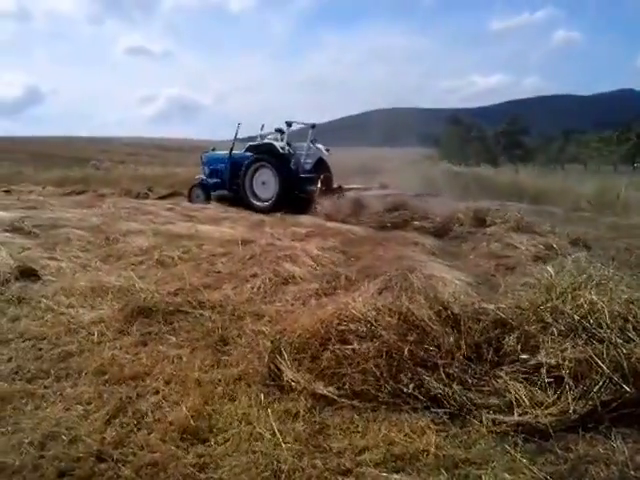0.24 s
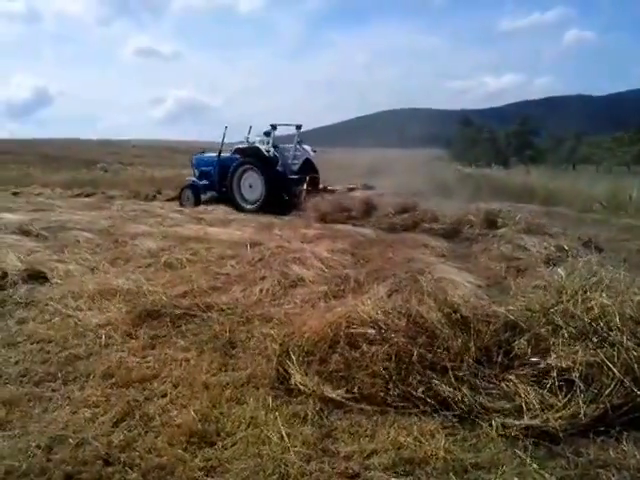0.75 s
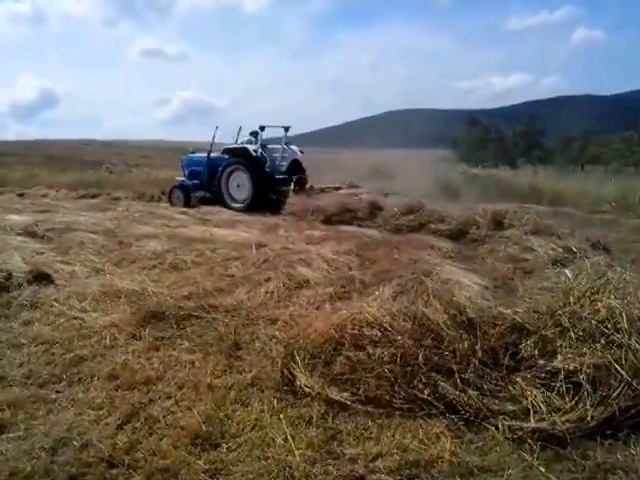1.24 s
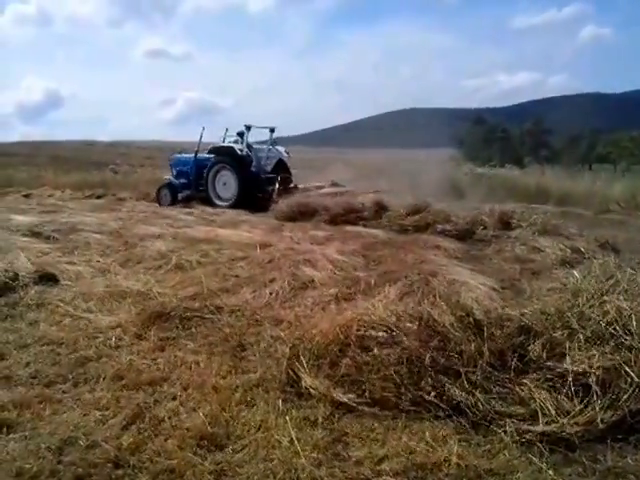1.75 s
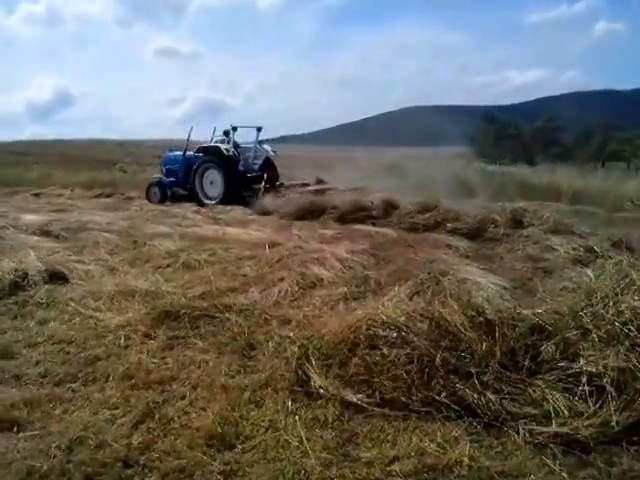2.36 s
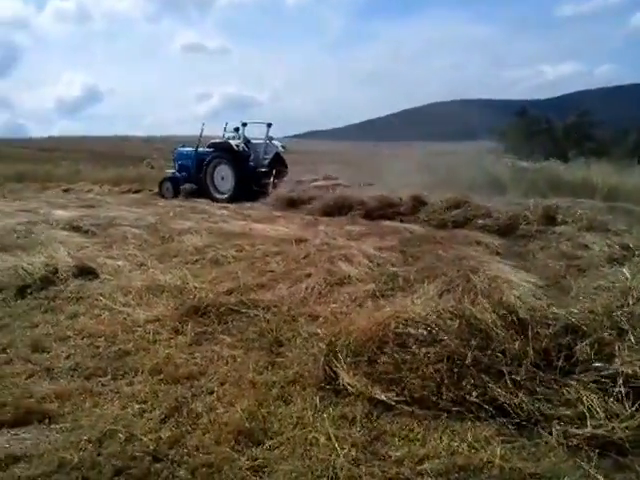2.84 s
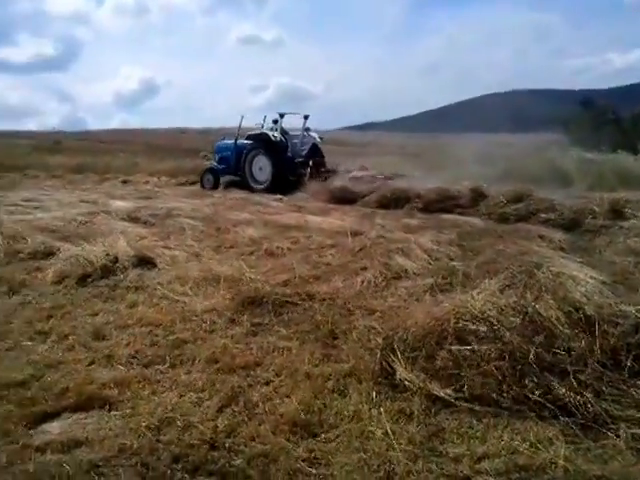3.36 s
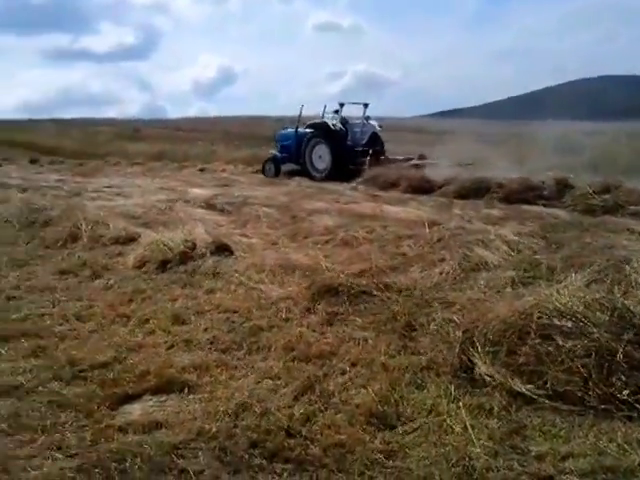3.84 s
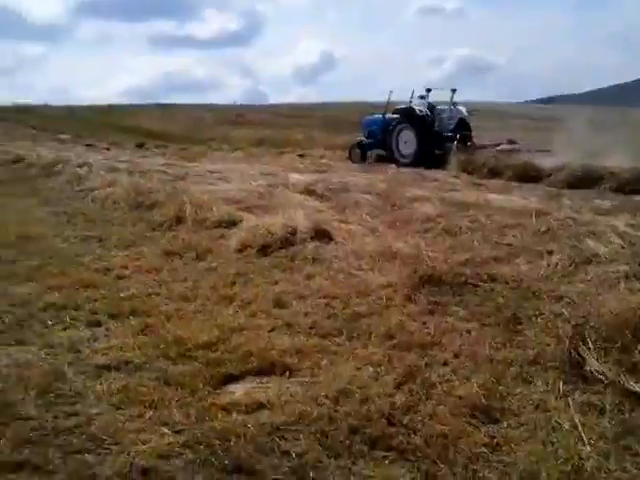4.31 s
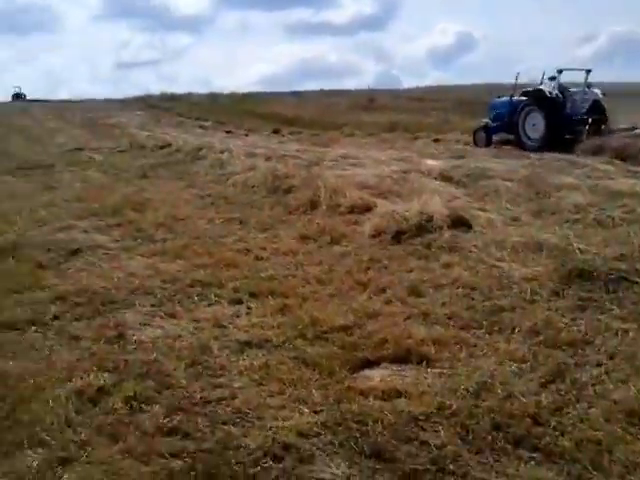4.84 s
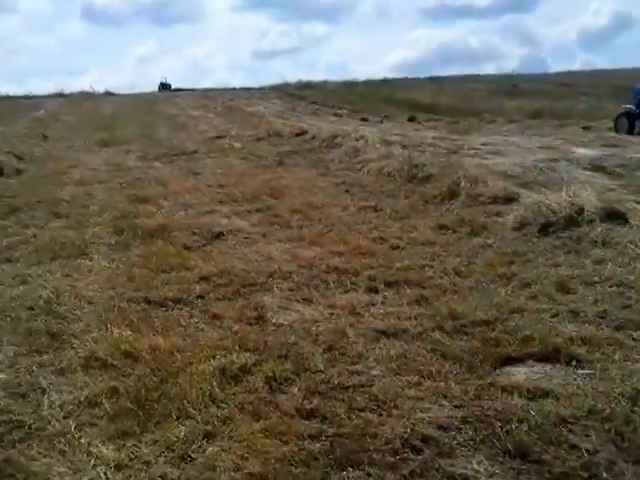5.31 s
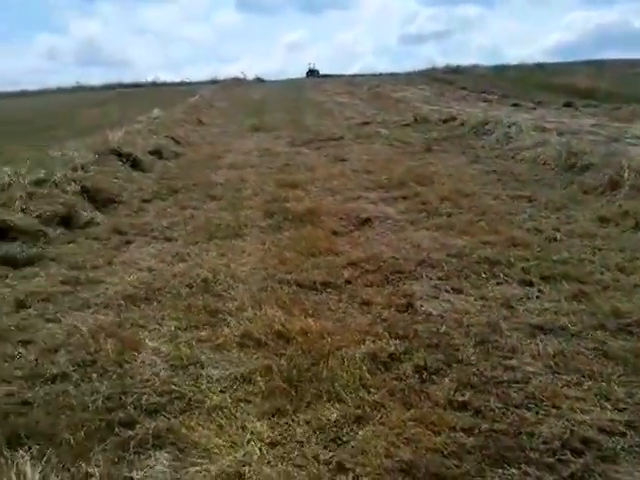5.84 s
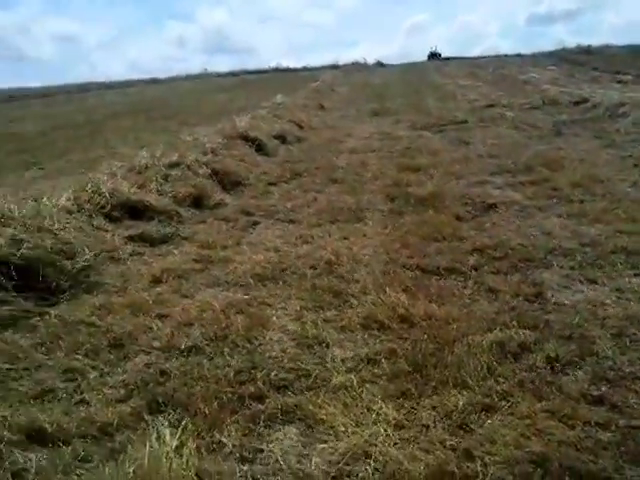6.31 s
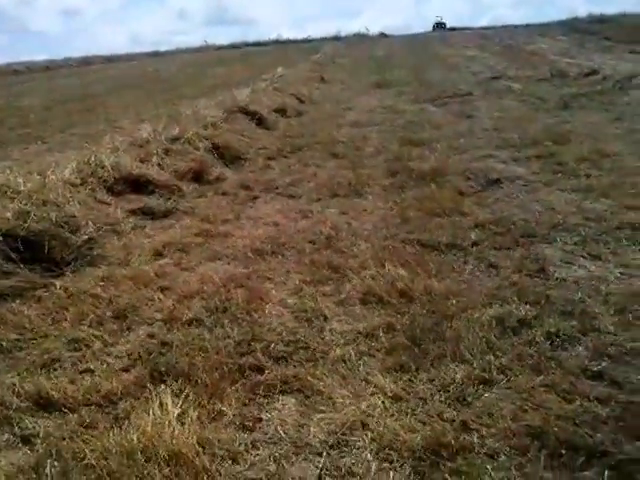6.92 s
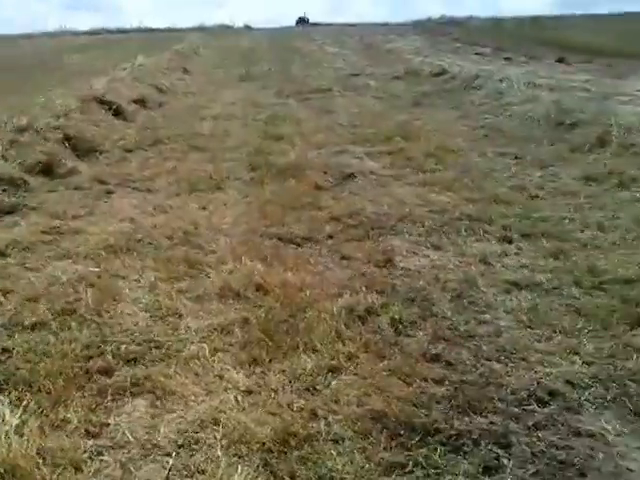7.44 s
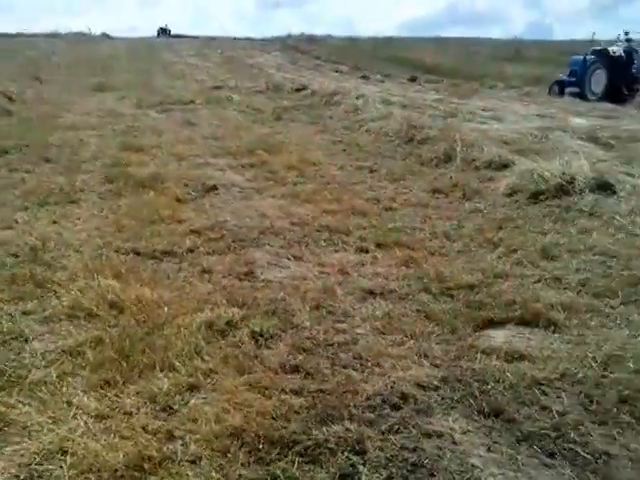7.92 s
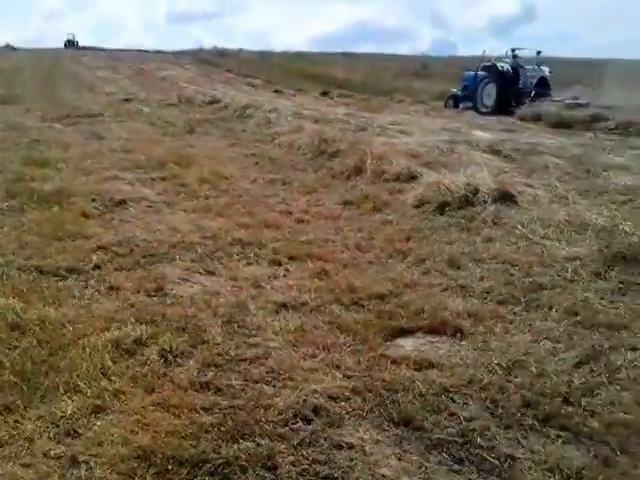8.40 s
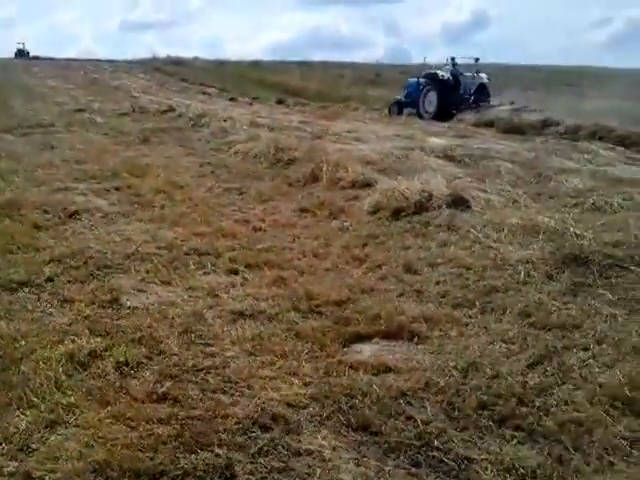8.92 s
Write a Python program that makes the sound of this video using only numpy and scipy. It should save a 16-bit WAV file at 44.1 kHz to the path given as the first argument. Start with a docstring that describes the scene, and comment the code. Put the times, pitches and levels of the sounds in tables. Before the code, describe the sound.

Dry hay crackles and crunches under feet close to a hand-held microphone, over the even putter, drone and clatter of a diesel tractor farther out in the field. The engine fades only slightly as it moves off, and its rake adds a faint ringing hiss, small clanks and an occasional thin squeak. Wind buffets the microphone in short low bursts, early on, most strongly midway, and again a little later.

```python
"""Tractor raking hay

A diesel tractor pulls a hay rake across a field, some way off, slowly drawing away: the exhaust
putters, the engine clatters and whines, the rake hisses, squeaks and clanks. Dry hay rustles and
crunches underfoot close to a hand-held camera, and gusts thump on its single microphone."""
import sys
import numpy as np
from scipy import signal
from scipy.fft import rfft, irfft, next_fast_len
from scipy.io import wavfile
from scipy.ndimage import uniform_filter1d, map_coordinates

SR = 44100
rng = np.random.default_rng(int(sys.argv[2]) if len(sys.argv) > 2 else 0)


def to_wav(sig):
    """Store sig (one row per channel, or 1-D mono) as 16-bit WAV at the path in sys.argv[1].

    Samples outside -1..1 are clipped; the rate is SR.
    """
    pcm = np.clip(np.atleast_2d(sig), -1, 1) * 32767
    pcm = np.round(pcm).astype(np.int16)
    wavfile.write(sys.argv[1], SR, pcm.T)  # frames by channels


N = 403956

# how hard the hay is stirred underfoot (time [s], level [dB])
HAY_STIR = [(0, -34.5), (0.66, -33.5), (0.82, -30.5), (1.7, -32.5), (2.55, -34.5), (3.7, -34.5), (4.2, -30),
            (4.5, -25.5), (4.95, -33), (5.8, -31.5), (6.15, -38.5), (6.45, -30), (7.0, -31), (7.65, -34.5),
            (8.25, -35.5), (8.9, -39), (9.16, -34)]


def tractor():
    """Exhaust, drone, clatter and whine follow the engine's speed and fade as the tractor draws away."""
    # engine speed (time [s], exhaust beats [1/s])
    speed = [(0, 35.71), (0.5, 35.98), (1.55, 35.52), (3, 35.43), (3.5, 36.13), (4.6, 35.89), (6.7, 35.98),
             (7, 36.28), (7.8, 36.26), (8.1, 35.85), (8.45, 36.2), (8.8, 35.88)]
    # tones of gears and fan (pitch [multiple of the beat rate], level [dB], waver [dB])
    gear_tones = [(18, -47, .8), (21, -53, 2.5), (21.66, -49.5, 2.5), (32.45, -52, 2.5)]
    start_m, away_m_per_s = 18, 1
    putter_db, drone_db, clatter_db = -37.5, -41, -32.5  # at the starting distance
    nearness = start_m / (start_m + away_m_per_s * np.arange(N) / SR)
    beats = np.cumsum(curves(speed)[0] * (1 + 0.0006 * wobble(11))) / SR
    putter = amp(putter_db + 1.4 * wobble(2.995)) * exhaust(beats, scatter_db=0.7)
    body = amp(drone_db) * drone(beats)
    # an unsteady shaft and moving air blur the tones, the higher ones most
    shaft = beats + .0015 * wobble(30)
    whine = sum(amp(db + waver * wobble(7)) * np.sqrt(2) * np.sin(2 * np.pi * multiple * shaft)
                for multiple, db, waver in gear_tones)
    metal = amp(clatter_db) * clatter(beats, depth_db=1.2, waver_db=1.5)
    return nearness * (putter + body + whine + metal)


def exhaust(beats, scatter_db):
    """Three unequal cylinders blow through the pipe in turn: a strong puff each beat, then a weak one."""
    # strength of each cylinder, in firing order (level [dB])
    cylinder_db = [-2, 0, 0.2]
    # puffs within one beat (place in the beat [0-1], level [dB])
    puffs = [(.38, 7), (0.812, -2.5)]
    # tone of the exhaust pipe (frequency [Hz], gain [dB])
    pipe_eq = [(25, -45), (40, -46), (70, -4.5), (110, -1), (145, 1), (180, 3), (215, 1.5), (250, 0.5),
               (330, -8), (450, -19), (900, -28.5)]
    beat_starts, pulses = np.arange(int(beats[-1]) + 1), np.zeros(N)
    for place, db in puffs:
        at = np.searchsorted(beats, beat_starts + place)
        size = amp(db + np.resize(cylinder_db, len(at)) + scatter_db * rng.standard_normal(len(at)))
        pulses += np.bincount(at, size, N + 1)[:N]
    # the silencer holds each puff back near its 190 Hz resonance, which rounds it off
    ring = lambda hz: 190 ** 2 - hz ** 2 + 1j * hz * 170
    return coloured(filtered(pulses, lambda hz: np.conj(ring(hz)) / ring(hz)), pipe_eq)


def clatter(beats, depth_db, waver_db):
    """Combustion knock and valve gear shake the metal twice a beat, heard side-on, then tail-on."""
    # the turn from side-on to tail-on (time [s], tail share [0-1], level [dB])
    turn = [(0, 0.15, -1), (3.0, 0.13, 0), (4.0, 0.44, -0.5), (5.5, 1, 1.5), (7.0, 1, 3), (7.8, 0.98, -0.1),
            (9.16, 0.96, 0)]
    # peaks of the clatter heard from the side, coloured by ground and nearby reflections
    # (frequency [Hz], width [Hz], level [dB])
    side_peaks = [(762, 134, 4.5), (932, 120, 6), (1230, 170, 6), (1267, 217, 6.5), (2030, 266, 4.5),
                  (2766, 320, 3), (3480, 300, 5), (4160, 420, 1), (4760, 510, -0.5), (5320, 170, 4.5),
                  (6310, 140, -1), (6980, 76, 4), (10650, 1200, -8)]
    # peaks of the clatter heard from the tail (frequency [Hz], width [Hz], level [dB])
    tail_peaks = [(850, 380, 1), (960, 400, 1.5), (1190, 144, 6.5), (1805, 217, 6.5), (2214, 340, 2.5),
                  (2760, 300, 3.5), (3470, 240, 2), (5160, 1850, -1), (7400, 4100, -10.5)]
    # the side-on clatter's tone slides slightly as the hand-held camera moves (time [s], pitch [ratio])
    camera_drift = [(0, .994), (2.2, 1.012), (3.8, .982)]
    tail_share, facing_db = curves(turn)
    knocks = amp(depth_db * np.cos(4 * np.pi * beats) + np.cos(2 * np.pi * beats))
    side = resonant(knocks * rng.standard_normal(N), side_peaks) * amp(4.5)
    side = map_coordinates(side, [np.cumsum(curves(camera_drift)[0])], mode="mirror")
    tail = resonant(knocks * rng.standard_normal(N), tail_peaks) * amp(1.0)
    crossfade = np.sqrt(1 - tail_share) * side + np.sqrt(tail_share) * tail
    return crossfade * amp(facing_db + waver_db * wobble(14))


def drone(beats):
    """A low bed of engine noise swells slightly once a beat."""
    # spectrum of the drone (frequency [Hz], density [dB])
    drone_eq = [(20, -33), (45, -29), (90, -20), (160, -9.5), (260, 4), (380, -5.5), (520, -7.5), (700, -7),
                (1100, -18), (2000, -40)]
    return amp(-0.5 * np.sin(2 * np.pi * beats)) * coloured(rng.standard_normal(N), drone_eq)


def underfoot():
    """The hay reaches the microphone directly and once more off a surface close by."""
    echo_s, echo_gain = .0016, .22
    hay = rustle() + crunches() + small_crunches()
    return filtered(hay, lambda hz: 1 + echo_gain * np.exp(-2j * np.pi * hz * echo_s))


def rustle():
    """Dry stalks rub and crack in small clumps; a finer, brittle hiss lies on top."""
    # spectrum of rubbing straw (frequency [Hz], density [dB])
    straw_eq = [(200, -24), (600, -13.5), (1500, -1), (2500, -3), (4200, 4.5), (6000, 2.5), (8200, -0.5),
                (9200, -16), (12000, -30), (16000, -26)]
    # spectrum of the brittle hiss (frequency [Hz], density [dB])
    brittle_eq = [(3000, -36), (6500, 4.5), (8300, 2), (9300, -1.5), (11300, 1), (13000, -2.5),
                  (15500, -6.5)]
    # fader ride of that hiss (time [s], level [dB])
    brittle_ride = [(0, -35.5), (0.65, -41.5), (0.8, -34.5), (1.3, -38.5), (1.7, -35.5), (2.5, -42.5),
                    (3.1, -38), (3.5, -42), (4.0, -36.5), (4.6, -30), (5.1, -34), (5.7, -34.5), (6.0, -37),
                    (6.45, -34), (7.1, -36.5), (8.3, -37.5), (8.78, -38), (8.88, -48), (9.16, -38)]
    rustle_db, = curves(HAY_STIR)
    brittle_db = curves(brittle_ride)[0] + 0.5
    surges = clumps(per_s=45, t60=.1, depth=2.8)
    straw = coloured(patchy(crackle(N, spread_db=4), depth_db=2.6), straw_eq)
    brittle = coloured(patchy(crackle(N, spread_db=0), depth_db=1.8), brittle_eq) * amp(.8 * wobble(25))
    cracks = amp(rustle_db - 12.5) * ticks(per_s=28, hz=6500, t60=.008)
    return surges * (amp(rustle_db) * straw + amp(brittle_db) * brittle) + cracks


def ticks(per_s, hz, t60):
    """Single thin stalks crack at random moments, at rms 1."""
    kicks = (rng.random(N) < per_s / SR) * rng.random(N) ** 2
    force = signal.lfilter([1], [1, -amp(-60 / (t60 * SR))], kicks)
    return hump(force * rng.standard_normal(N), hz, octaves=1)


def crunches():
    """Feet crush tufts, large and small; a thick stalk breaks with one snap."""
    # crushed tufts (time [s], level [dB], centre [Hz], t60 [s])
    tufts = [(0.677, -15.5, 4400, 0.056), (0.69, -22.5, 2600, 0.9), (0.99, -23, 1600, 0.086),
             (1.067, -27, 5000, .1), (1.412, -26.5, 9000, 0.17), (1.455, -21, 4670, 0.049),
             (1.537, -24, 3000, 0.97), (1.612, -24, 5300, 0.76), (1.859, -22, 3000, 0.4),
             (1.915, -25, 5500, 0.32), (2.208, -26.5, 1400, 0.22), (2.243, -23, 3500, 0.64),
             (2.381, -21.5, 4570, 0.13), (2.489, -31.5, 10000, 0.092), (2.621, -29, 7800, 0.23),
             (2.735, -29, 8300, 0.34), (3.059, -21.5, 3700, 0.094), (3.712, -27, 4500, .08),
             (3.735, -21.5, 1900, 0.1), (3.805, -27, 7000, .06), (4.133, -31, 11000, 0.09),
             (4.178, -22.5, 7300, 0.072), (4.349, -12, 6600, 0.11), (4.416, -14, 2300, 0.087),
             (4.425, -20, 5000, 0.35), (4.545, -23, 6000, 0.31), (4.724, -26, 10000, .15),
             (4.965, -25.5, 8000, .15), (5.011, -23, 7950, .1), (5.048, -21.5, 3200, 0.12),
             (5.329, -24, 6500, .08), (5.479, -21, 4800, 0.33), (5.646, -22, 3900, 0.2),
             (5.805, -23, 5500, 0.33), (5.859, -22, 5500, 0.33), (6.031, -25.5, 7450, 0.66),
             (6.23, -19.5, 3860, 0.074), (6.316, -26, 8600, 0.2), (6.36, -24, 6300, 0.32),
             (6.492, -30, 12500, .18), (6.519, -17, 4340, 0.06), (6.789, -25.5, 7500, 0.19),
             (6.939, -24, 3400, 0.14), (7.022, -16, 6800, 0.046), (7.072, -21.5, 2100, 0.12),
             (7.346, -22, 6400, 0.22), (7.474, -27.5, 2000, 0.23), (7.776, -26.5, 7460, 0.14),
             (7.916, -27.5, 7300, 0.1), (8.003, -22.5, 2690, 0.15), (8.246, -28, 9800, 0.33),
             (8.56, -29, 3200, 0.21), (8.71, -31.5, 8950, 0.76)]
    # thick stalks breaking (time [s], peak [dB], centre [Hz])
    stalks = [(0.68, -21, 4800), (4.352, -7, 5650), (6.232, -17.5, 4200), (6.317, -9, 9500),
              (6.320, -6, 8100), (6.519, -11, 4200), (6.805, -2.5, 6900), (7.024, -14, 7000),
              (7.348, -10, 9600), (8.003, -15, 4500)]
    out, t = np.zeros(N), np.arange(SR // 4) / SR
    for s, db, hz, t60 in tufts:
        add(out, s, amp(db - 2.5) * crunch(hz, t60, attack_s=0.00072))
    for s, db, hz in stalks:
        snap = hump(rng.standard_normal(len(t)) * amp(-60 * t / .005), hz, octaves=.45)
        add(out, s, amp(db) * snap / np.abs(snap).max())
    return out


def small_crunches(per_s=3, over_rustle_db=3.5, centre_hz=5200):
    """Lesser tufts give way at random moments, as strongly as the hay is stirred."""
    out, count = np.zeros(N), round(per_s * N / SR)
    for k in range(count):
        s = (k + rng.random()) * N / SR / count
        size, pitch = rng.standard_normal(2)
        db = np.interp(s, *np.transpose(HAY_STIR)) + over_rustle_db + 2.0 * size
        add(out, s, amp(db) * crunch(centre_hz * np.exp(0.22 * pitch), t60=0.096, attack_s=0.0029))
    return out


def crunch(hz, t60, attack_s):
    """A crushed tuft gives way at once, then dies in a shower of fractures."""
    t = np.arange(SR // 4) / SR
    octaves = 0.79 * (t60 / 0.12) ** 0.68 * (4800 / hz) ** 1.6  # longer, deeper crunches are broader
    force = (amp(-60 * t / t60) + .5 * np.exp(-t / 0.017)) * (1 - np.exp(-t / attack_s))
    return force * hump(crackle(len(t), spread_db=0.5), hz, octaves)


def wind():
    """A breeze stirs at the microphone port; gusts flutter in trains of eddies, big eddies thump singly."""
    # light air between the gusts (time [s], level [dB])
    breeze = [(0, -51), (1.1, -48), (1.4, -45), (2.3, -43), (2.8, -50), (3.6, -48), (4.6, -36),
              (5.2, -48.5), (6.7, -38), (7.5, -44), (8.3, -41), (9.16, -45)]
    # spectrum of its rumble (frequency [Hz], density [dB])
    rumble_eq = [(25, -15), (60, 0), (110, 0), (240, 2), (400, -10.5), (800, -28), (3000, -70)]
    # fluttering gusts (time [s], level [dB], half-length [s], eddy pitch [Hz])
    gusts = [(1.562, -28, 0.037, 250), (1.828, -24.5, 0.021, 237), (1.875, -20, 0.022, 270),
             (1.984, -26, 0.046, 273), (3.927, -25.5, 0.024, 214), (4.35, -22, 0.033, 295),
             (4.45, -18, 0.056, 277), (4.515, -17.5, 0.028, 300), (4.79, -23.5, 0.006, 237),
             (5.532, -22, 0.0064, 258), (5.815, -21.5, 0.032, 240), (5.917, -25.5, 0.026, 268),
             (5.964, -20.5, 0.011, 493), (6.466, -31, 0.05, 247), (6.585, -24.5, 0.039, 233),
             (6.671, -22, 0.053, 242), (6.891, -24, 0.049, 256), (6.985, -23, 0.058, 250),
             (7.119, -27.5, 0.023, 226)]
    # single big eddies (time [s], level [dB], pitch [Hz])
    thumps = [(1.541, -9, 287), (1.862, -9.5, 374), (1.886, -9, 229), (1.925, -9.5, 227),
              (3.089, -16.5, 264), (4.336, -9, 310), (4.349, -9, 302), (4.396, -6.5, 210), (4.417, -6, 230),
              (4.431, -7.5, 388), (4.458, -2, 282), (4.470, -9, 350), (4.501, -9.5, 402),
              (4.545, -0.5, 330), (5.729, -17, 220), (5.807, -6.5, 317), (5.821, -10, 310),
              (5.830, -6.5, 288), (6.646, -11, 323), (6.665, -10, 290), (6.739, -11, 283),
              (6.909, -16, 276), (6.945, -10, 289), (6.965, -6.5, 278), (6.981, -15, 404),
              (8.199, -17.5, 320)]
    # how the port colours the wind (frequency [Hz], gain [dB])
    port_eq = [(20, -36), (100, -2.5), (330, -2), (510, 4), (700, -1.5), (950, 3.5), (1200, 5), (1600, -10)]
    eddy_gap_s, wake_s, wake_db = 0.0052, 0.12, -12.5
    out = amp(curves(breeze)[0] + 4.8 * wobble(16)) * coloured(rng.standard_normal(N), rumble_eq)
    t = np.arange(-SR // 4, SR // 4) / SR
    slots = np.arange(-12, 13)
    for s, db, half_s, hz in gusts:
        at = (slots + 0.262 * rng.standard_normal(len(slots))) * eddy_gap_s
        core = eddies(t, at, hz, weight=2 ** (-2 * (at / half_s) ** 2))
        # weak eddies straggle before and after the gust
        wake = eddies(t, wake_s * rng.uniform(-1, 2, size=6), hz, weight=np.ones(6))
        add(out, s + t[0], amp(db + 2.0) * np.sqrt(half_s * SR) * (core + amp(wake_db) * wake))
    for s, db, hz in thumps:
        add(out, s + t[0], amp(db + 0.5) * eddy(t, hz, rng.uniform(0, 2 * np.pi)))
    return shaped(out, port_eq)


def eddies(t, at, hz, weight, scatter_db=3):
    """A train of eddies of uneven size and pitch passes at the given times, with unit energy."""
    size, pitch, turn = rng.standard_normal((3, len(at), 1))
    each = amp(scatter_db * size) * eddy(t - at[:, None], hz * np.exp(0.2 * pitch), np.pi * turn)
    train = weight @ each
    return train / np.linalg.norm(train)


def eddy(t, hz, phase, decay_cycles=.52, edge=.3):
    """One eddy passes the port: the pressure swings for a cycle or two, steepest at its heart."""
    swell = np.exp((.25 - np.hypot(hz * t, .25)) / decay_cycles)
    turn = 2 * np.pi * hz * t + phase
    return swell * np.sin(turn) + edge * swell ** 2 * np.sin(2 * turn)


def rake(steady_db=-45.5):
    """The tines hiss and ring through the stubble; a dry joint squeaks now and then."""
    # the tines bite deeper (time [s], level [dB], half-length [s])
    bites = [(4.65, -42, 0.98), (8.08, -42, 0.45)]
    # ring of the tines (frequency [Hz], width [Hz], level [dB])
    tine_modes = [(4120, 310, 11), (4600, 310, 5.5)]
    # squeaks of the joint (time [s], level [dB], pitch [Hz], half-length [s])
    squeaks = [(1.99, -32.5, 4950, .06), (3.542, -26, 6920, .014), (5.51, -30, 7010, .03)]
    now = np.arange(N) / SR
    swells = sum(amp(db) * np.exp(-2 * ((now - s) / half_s) ** 2) for s, db, half_s in bites)
    drag = (amp(steady_db) + swells) * amp(1.5 * wobble(25) + 1.0)
    out = drag * resonant(rng.standard_normal(N), tine_modes)
    t = np.arange(-SR // 8, SR // 8) / SR
    for s, db, hz, half_s in squeaks:
        tone = resonant(rng.standard_normal(len(t)), [(hz, hz / 70, 0)])
        add(out, s + t[0], amp(db) * np.exp(-2 * (t / half_s) ** 2) * tone)
    return out


def clanks(t60=0.096, attack_s=0.0007):
    """The rake jolts over bumps and its frame rings briefly."""
    # jolts of the rake (time [s], level [dB])
    jolts = [(0.288, -26), (1.235, -26), (1.819, -26), (3.971, -27), (4.418, -18), (4.515, -23)]
    # ring of the frame (frequency [Hz], width [Hz], level [dB])
    frame_modes = [(1204, 140, 2.5), (1780, 110, -4), (2680, 150, -4.5)]
    out, t = np.zeros(N), np.arange(SR // 4) / SR
    force = amp(-60 * t / t60) * (1 - np.exp(-t / attack_s))
    for s, db in jolts:
        add(out, s, amp(db) * force * resonant(rng.standard_normal(len(t)), frame_modes))
    return out


def hollowed(x, width_hz=160):
    """Reflections close to the microphone cut two narrow notches, which slide as the camera is turned."""
    # path of the notches (time [s], lower [Hz], upper [Hz], depth [dB])
    notches = [(0, 2410, 5900, 4), (2.2, 2500, 6020, 8.5), (4, 2220, 5640, 2.5), (5.3, 2280, 5850, 1.5),
               (6.5, 2580, 5980, 7), (7.6, 2600, 6200, 1)]
    hz, t, spectrum = signal.stft(x, SR, nperseg=1024)
    s, *cols = np.transpose(notches)
    lower, upper, depth_db = [np.interp(t, s, c) for c in cols]
    dips = sum(np.exp(-((hz[:, None] - centre) / width_hz) ** 2) for centre in (lower, upper))
    return signal.istft(spectrum * amp(-depth_db * dips))[1][:len(x)]


def crackle(count, spread_db):
    """Dense tiny fractures: noise in 8-sample grains whose levels scatter by spread_db, at rms 1."""
    noise = rng.standard_normal(count)
    grain_db = spread_db * np.repeat(rng.standard_normal(count // 8 + 1), 8)[:count]
    return unit(noise * amp(grain_db))


def patchy(x, depth_db):
    """Random gain on small patches of time and frequency: each stalk sounds at its own pitch."""
    spectrum = signal.stft(x, nperseg=256)[2]
    bands = uniform_filter1d(rng.standard_normal(spectrum.shape), size=7, axis=0)
    patches = uniform_filter1d(bands, size=4, axis=1)
    return signal.istft(spectrum * amp(depth_db * unit(patches)))[1][:len(x)]


def clumps(per_s, t60, depth):
    """A gain that jumps up at random moments and settles back, at rms 1."""
    kicks = (rng.random(N) < per_s / SR) * rng.uniform(.3, 1, N)
    burst_power = signal.lfilter([1], [1, -amp(-120 / (t60 * SR))], kicks)
    return unit(np.sqrt(1 + depth * burst_power))


def amp(db):
    """Decibels to gain."""
    return 10 ** (np.asarray(db) / 20)


def unit(x):
    """Scale to rms 1."""
    return x / np.sqrt(np.mean(x ** 2) + 1e-20)


def curves(rows):
    """Automation lanes: one value per sample for each column after the time."""
    s, *cols = np.transpose(rows)
    return [np.interp(np.arange(N) / SR, s, c) for c in cols]


def wobble(rate):
    """A smooth random curve, rate knots a second."""
    knots = rng.standard_normal(int(N * rate / SR) + 4)
    return map_coordinates(knots, [np.arange(N) * rate / SR], order=2)


def filtered(x, response):
    """x times a gain that depends on frequency."""
    size = next_fast_len(len(x) + 2048)
    return irfft(rfft(x, size) * response(np.fft.rfftfreq(size, 1 / SR)), size)[:len(x)]


def shaped(x, points):
    """x through an EQ curve of (frequency [Hz], gain [dB]) points."""
    f, db = np.transpose(points)
    return filtered(x, lambda hz: amp(np.interp(np.log(hz + 1), np.log(f), db)))


def coloured(x, points):
    """x through an EQ curve, at rms 1."""
    return unit(shaped(x, points))


def resonant(x, peaks):
    """x through a set of steep-sided peaks, at rms 1."""
    power = lambda hz: sum((amp(db) / (1 + 2 * ((hz - centre) / width) ** 2)) ** 2
                           for centre, width, db in peaks)
    return unit(filtered(x, lambda hz: np.sqrt(power(hz))))


def hump(x, centre_hz, octaves):
    """x through one broad band with gentle skirts and a soft top, at rms 1."""
    distance = lambda hz: np.log2((hz + 1) / centre_hz) / (1.14 * octaves + 0.045)
    top = lambda hz: 1 / np.sqrt(1 + (hz / (1.68 * centre_hz)) ** 4)
    return unit(filtered(x, lambda hz: (1 + distance(hz) ** 2) ** -.95 * hz / (hz + 600) * top(hz)))


def add(track, s, sound):
    """Mix a sound into a track at time s."""
    part = track[max(round(s * SR), 0):][:len(sound)]
    part += sound[:len(part)]


def scene():
    """Tractor, rake, hay and wind meet at one microphone, which feeds both channels."""
    field = hollowed(tractor() + rake() + clanks() + underfoot())
    return np.tile(field + wind(), (2, 1))


def record(dry, top_hz=15850):
    """The camera flattens peaks at full scale and keeps nothing above its band limit."""
    return np.array([filtered(x, lambda hz: hz < top_hz) for x in np.clip(dry, -1, 1)])


dry = scene()
out = record(dry)
to_wav(out)
```